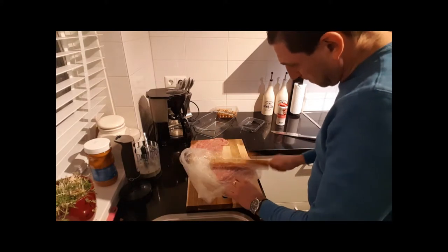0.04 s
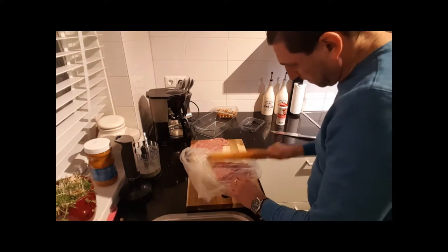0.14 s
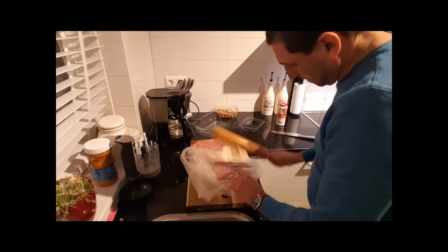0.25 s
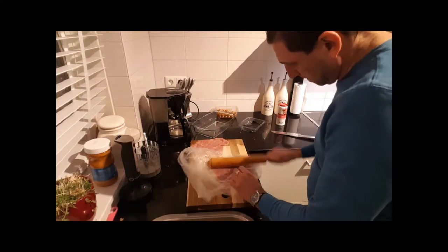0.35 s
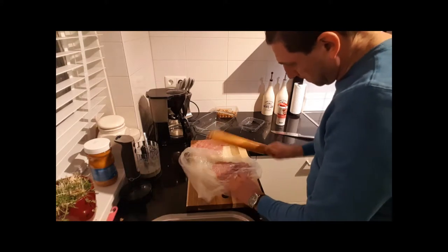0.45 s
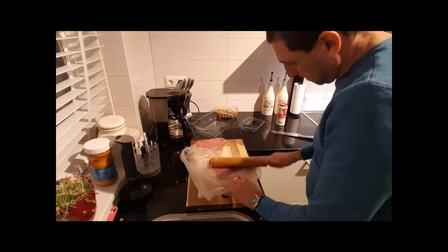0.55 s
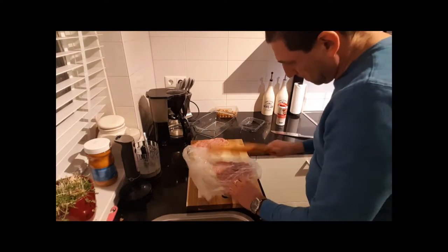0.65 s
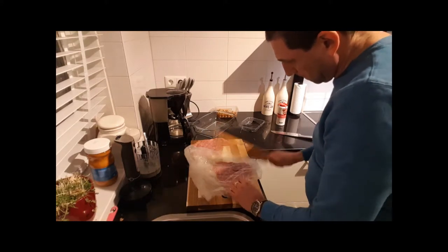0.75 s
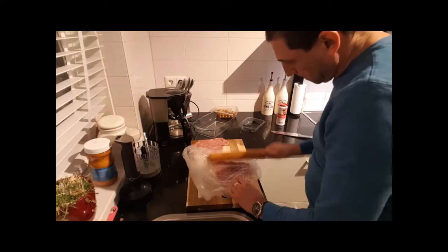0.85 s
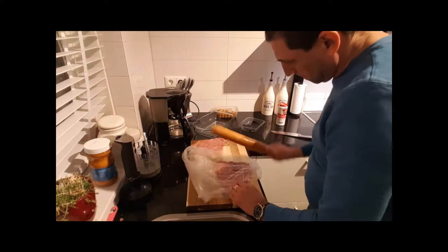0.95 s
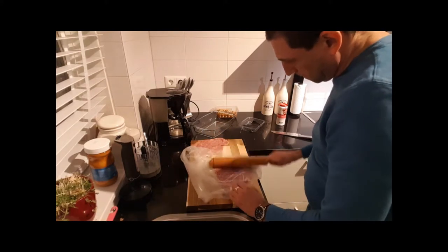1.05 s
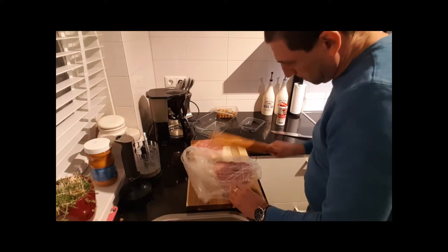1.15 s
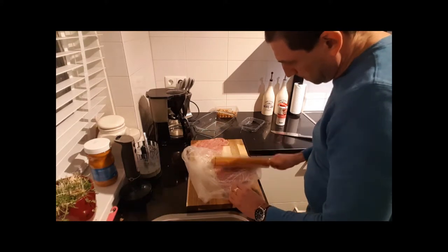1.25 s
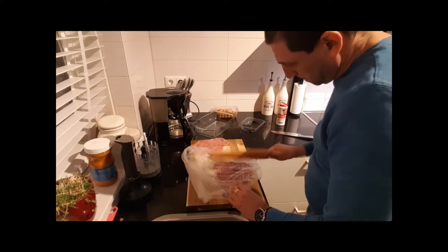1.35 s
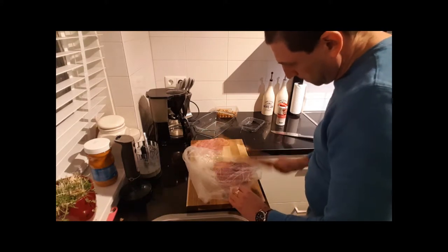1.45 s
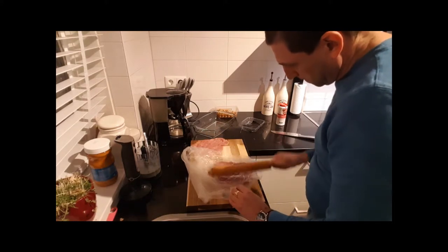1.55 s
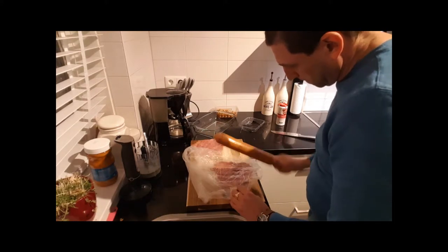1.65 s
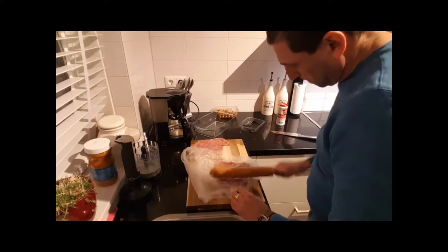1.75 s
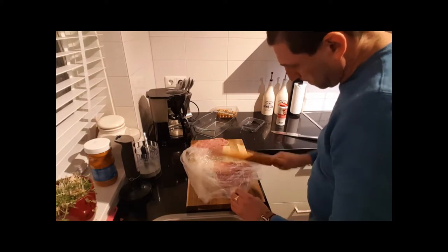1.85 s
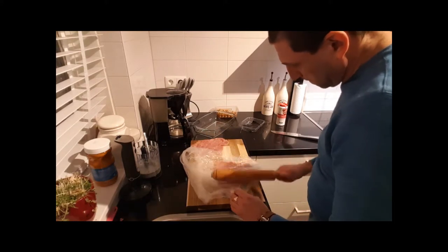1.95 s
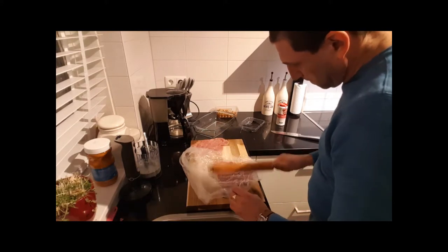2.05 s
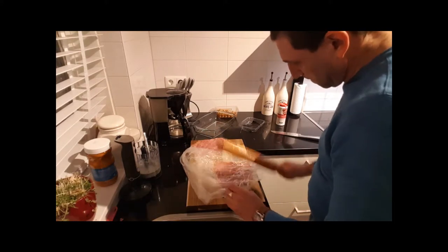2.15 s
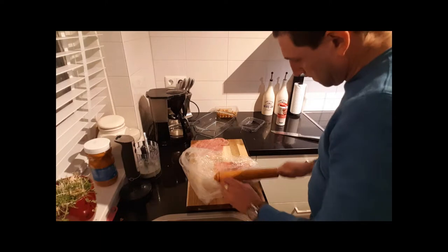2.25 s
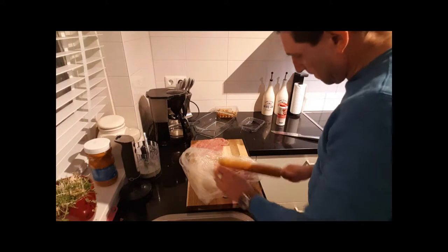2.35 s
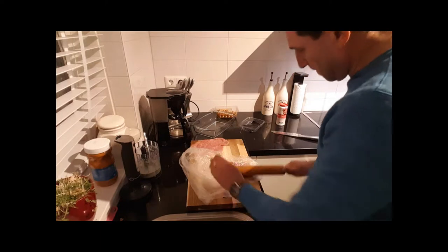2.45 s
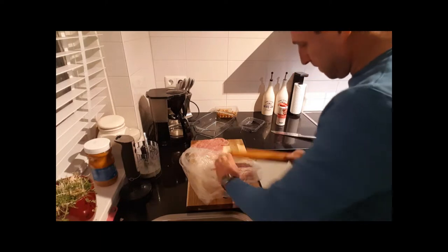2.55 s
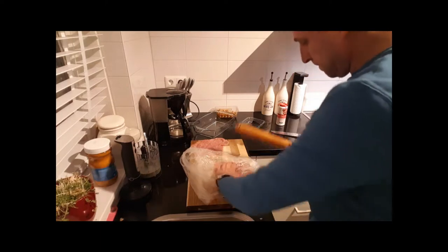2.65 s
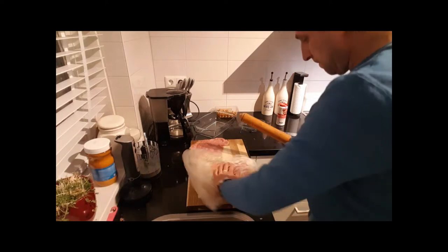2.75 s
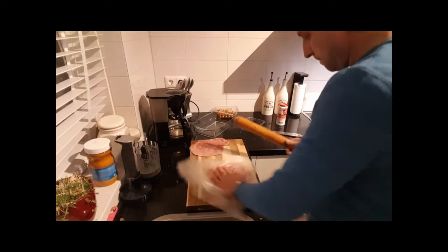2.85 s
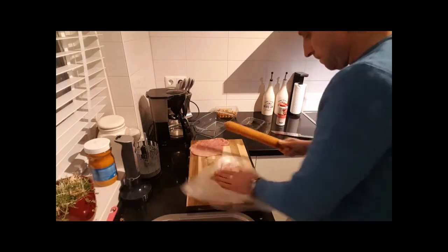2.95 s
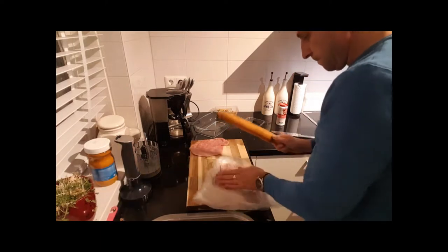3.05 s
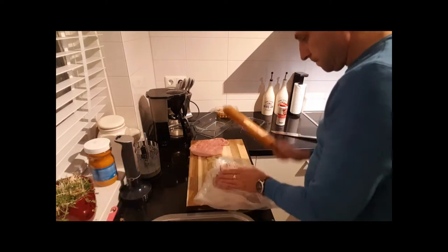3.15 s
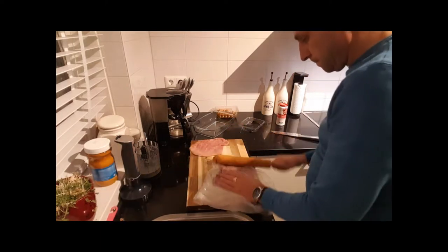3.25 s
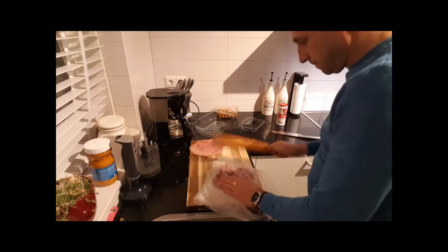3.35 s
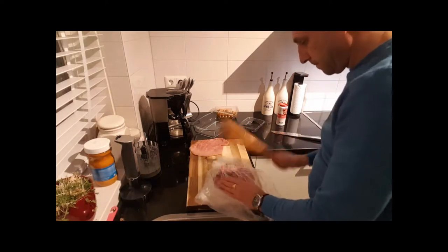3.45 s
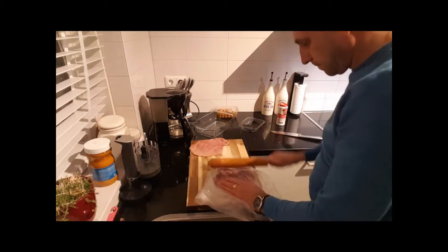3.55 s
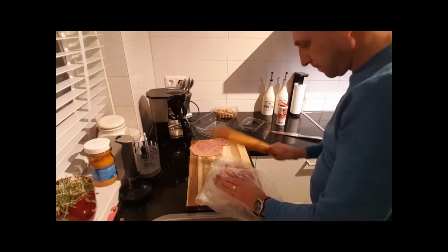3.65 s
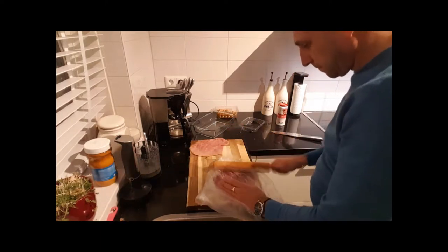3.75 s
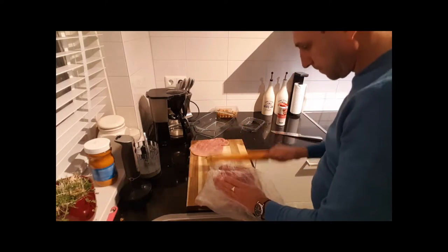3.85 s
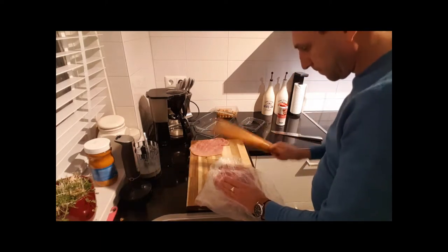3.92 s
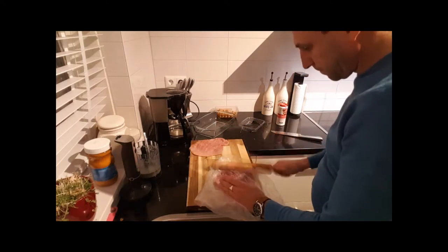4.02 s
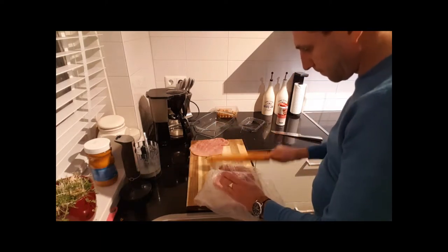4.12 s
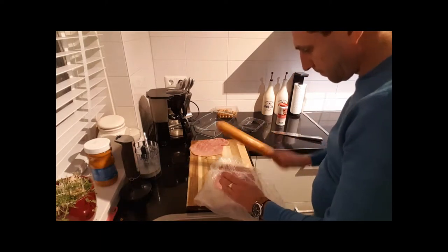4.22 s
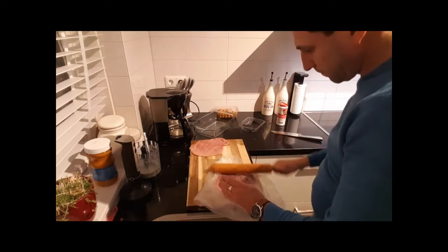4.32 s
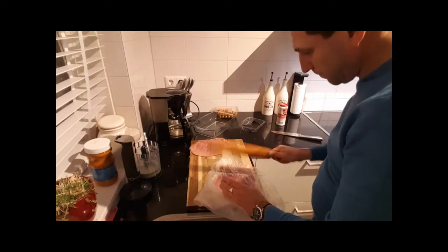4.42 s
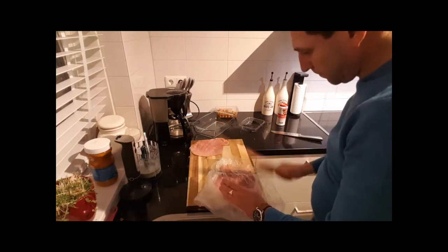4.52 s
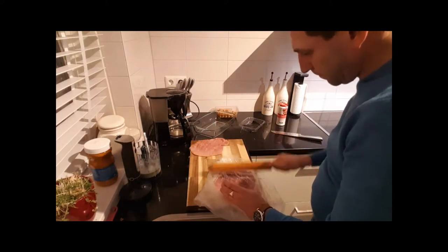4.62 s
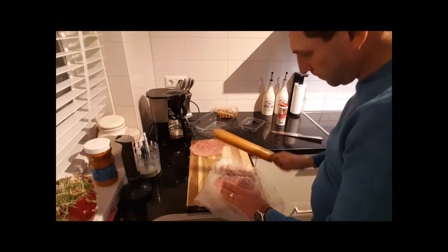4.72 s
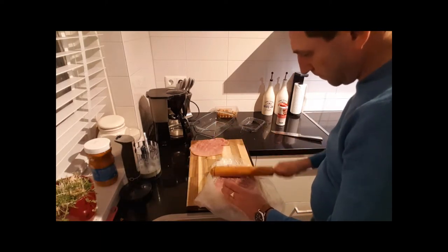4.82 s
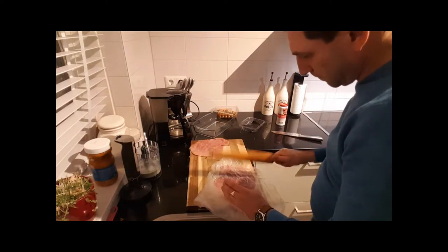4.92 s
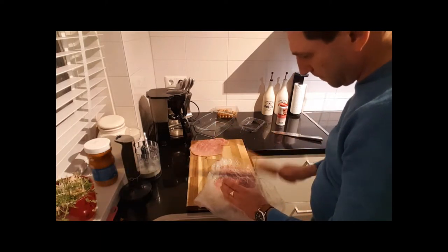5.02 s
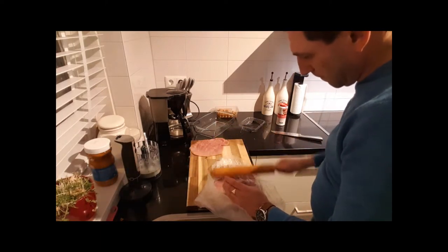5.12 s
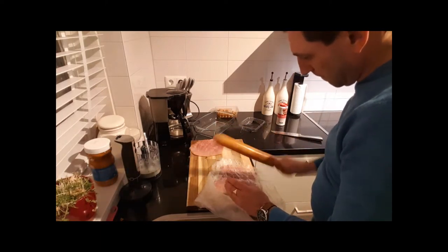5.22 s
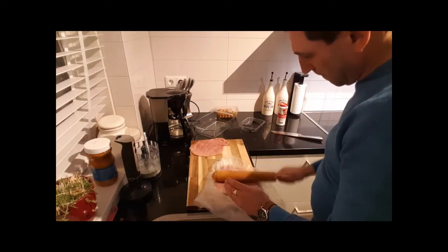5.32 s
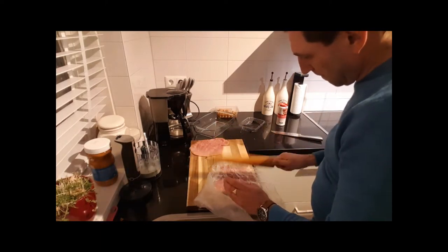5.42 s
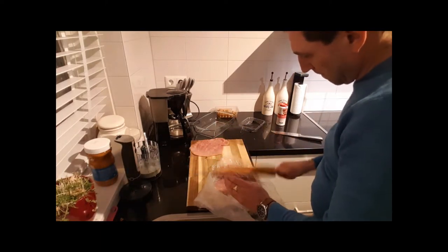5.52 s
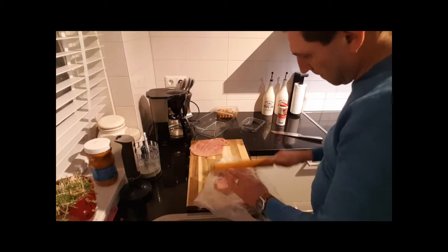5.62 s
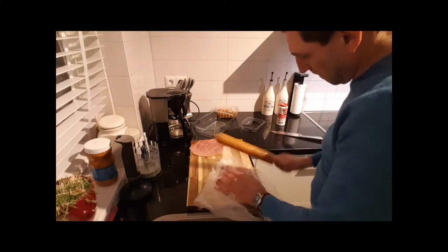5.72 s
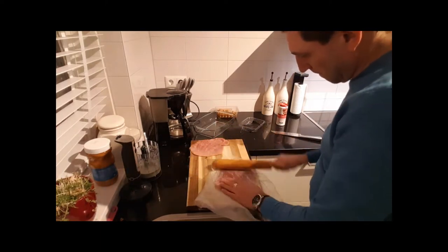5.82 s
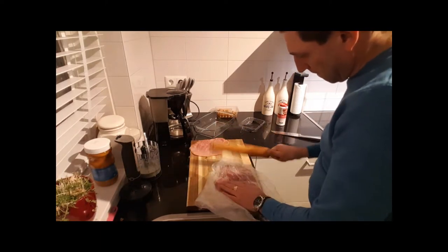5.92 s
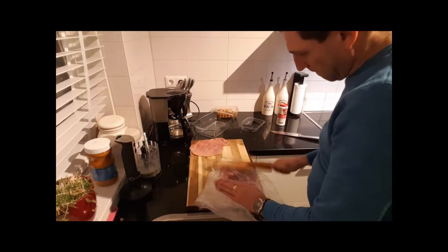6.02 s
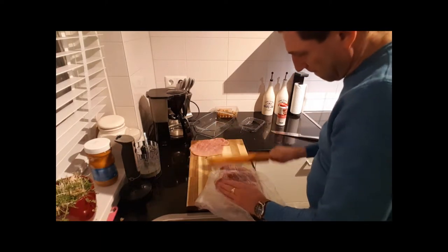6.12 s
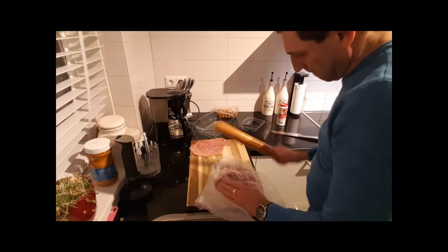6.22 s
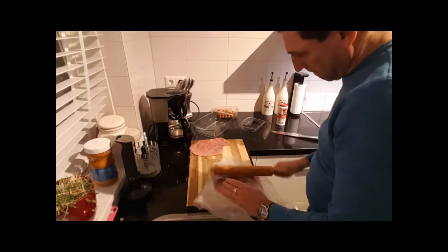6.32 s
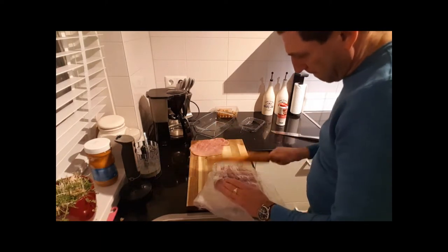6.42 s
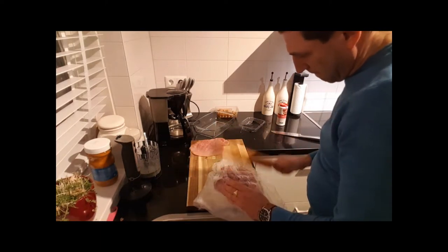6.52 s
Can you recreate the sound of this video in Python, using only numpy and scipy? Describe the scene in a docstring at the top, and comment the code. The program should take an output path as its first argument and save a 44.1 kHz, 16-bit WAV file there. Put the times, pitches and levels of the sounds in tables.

```python
"""A wooden rolling pin pounds meat in a plastic bag on a board, about four blows a second, in a tiled kitchen.
Each blow sets decaying tones ringing in worktop, board and jars, with bursts of shaped noise for the clatter.
Sharp clicks make the film snap. A hand shoves the bag, most strongly in a pause: noise and ticks rustle softly.
A faint steady noise is the still room."""
import sys
import numpy as np
from scipy import signal
from scipy.fft import rfft, irfft
from scipy.io import wavfile

SR = 44100
rng = np.random.default_rng(int(sys.argv[2]) if len(sys.argv) > 2 else 0)


def master_out(mix):
    """Clip the mix to full scale and print it as 16-bit PCM to the path in sys.argv[1]."""
    frames = np.transpose(np.atleast_2d(mix))
    ceiling = np.clip(frames, -1, 1)
    pcm = np.round(ceiling * 32767).astype(np.int16)
    wavfile.write(sys.argv[1], SR, pcm)


N = 289721   # length of the scene in samples

# Blows of the pin: start_s, thump_db, knock_db, smack_db, clack_db, slap_db, rebound_db (board dropping back)
BLOWS = [(-0.029, 3, -4.5, 1.5, .5, 0, -2.5), (0.202, 3, -1.5, -.3, .8, -.7, -5.5),
         (0.437, 2.3, 0, 1, 2.2, 1.7, -14), (0.675, -2.8, -1, -4.5, -8, -2.3, -25),
         (0.9165, 1.7, -2.3, -1.2, .3, -1, -3.5), (1.1565, -1, 0, 0, -3.4, -3, -7),
         (1.392, 2.2, .5, 0, -.6, 1.2, -2), (1.6177, .8, -5, 1.2, .4, 1, -13),
         (1.8535, 1, -3.3, 0, -.3, .3, -3), (2.0895, .6, -5.3, .7, 1.3, 0, -2.5),
         (2.3338, 1, -2.7, 2, 2, 2.2, -1.5), (2.519, -3, -15.5, -12, -9.5, -12.6, -10),
         (3.368, 1.7, 0, .5, 0, 0, .5), (3.63, 2, -.7, 2.3, .7, 0, -5.5),
         (3.892, -2.5, -6, 1.7, -3.5, -5, -6), (4.1635, .8, -1.7, -.5, .6, 1.3, -2.5),
         (4.418, .1, -2.6, -.5, .3, -.2, -4), (4.6764, 1.5, -4.3, -.5, .5, -.5, -.5),
         (4.9263, -2.2, -7, 2.2, .3, -6.3, .5), (5.1796, .6, -6.6, -1.2, -.3, 0, -1.5),
         (5.4262, 1.5, -1, 1.5, 1.6, 2.5, -.5), (5.6656, -3.3, -7.3, -10.3, -11, -8.5, -19),
         (5.906, .3, -3.8, 0, 0, -1.2, -3), (6.163, .7, -2.3, 0, .2, -.5, -6.5),
         (6.434, .5, -2, 1.1, 1, -.7, -3)]
# Centre pitches of thump, knock, smack, clack and slap: pitch_hz
PART_HZ = [200, 550, 1150, 2300, 8000]
# Ringing tones of the worktop and cupboard below: pitch_hz, level_db, t60_s (time to fall by 60 dB)
WORKTOP = [(42.1, -39, 0.74), (62.2, -33, 0.33), (74.9, -30, 0.45), (91.1, -35.5, 0.32), (120.9, -30, 0.55),
           (143.6, -56, 0.26), (167.6, -6, 0.03), (191.7, -20.5, 0.36), (218.2, -14.5, 0.26),
           (219.6, -6.5, 0.13), (240, -30, 0.86), (260.3, -28, .41), (283.2, -27, 0.66),
           (311.7, -34.5, 0.7), (331.7, -36.5, 0.72), (418, -33, 0.21), (475, -32.5, 0.33)]
# Slow standing waves of the kitchen: pitch_hz, level_db, t60_s
STANDING_WAVES = [(118.55, -37.5, 0.624), (189.7, -34, 0.68), (226.6, -25, 0.63), (145.3, -36, .6)]
# Hollow note of the cutting board: pitch_hz, level_db, t60_s
BOARD_NOTE = [(602, -20.5, 0.32)]
# Pin and jars on the worktop: pitch_hz, level_db, t60_s
WOOD = [(706, -33, 0.3), (871, -33.5, .25), (980, -38, 0.24), (1020, -40.5, 0.48), (1278, -43.5, .3),
        (1393, -40, .35), (1893, -38, .3), (2320, -37, .35), (2370, -35.5, .25), (2905, -40.5, .4),
        (3307, -65, .25), (3955, -48.5, .16)]
# Walls returning the boom: delay_s, level_db
BOOM_ECHOES = [(.0238, -8.5), (.0622, -19), (.1106, -16.5)]
# Tiles and cupboard doors returning the crack: delay_s, level_db
CRACK_ECHOES = [(.0095, -1), (.018, -2), (.0255, 0.5), (0.037, -1), (.047, -1), (.054, -1.5), (.087, -21)]
# Dense ring of board, crockery and tiles: pitch_hz, level_db_per_hz
CLATTER = [(100, -60), (200, -52), (350, -50), (550, -52.5), (800, -55.5), (1300, -57), (1800, -60.5),
           (2400, -60.5), (3200, -67), (5000, -73), (7800, -76.5), (9500, -85.5), (15000, -83)]
# First crack of the film, compared with that ring: pitch_hz, level_db
CRACK = [(200, -9), (1000, -13), (3000, 3), (7000, 8), (14000, 4.5)]
# How long the kitchen rings: pitch_hz, t60_s
KITCHEN = [(100, 1), (300, 0.58), (800, 0.77), (2000, 0.84), (4500, 0.73), (8000, 0.51), (14000, .32)]
# How alike left and right are: pitch_hz, correlation (no unit)
LIKENESS = [(100, .9), (250, 0.71), (500, 0.82), (1000, 0.093), (2000, 0.058), (5000, 0), (14000, 0.05)]
# Left level minus right level: pitch_hz, difference_db
TILT = [(50, 1.5), (125, -0.5), (250, -1.8), (500, -0.5), (1000, -2.1), (2200, -2), (4500, -2),
        (8000, -0.4), (14000, 4.5)]
# Tone of the bag's rustle, relative levels: pitch_hz, level_db_per_hz
BAG = [(530, -45), (900, -10), (1710, 1.5), (3220, -5.5), (4550, -6), (4880, -9), (7770, -8), (8860, -16),
       (11500, -12.5), (15500, -10)]
# Shoves of the bag by the free hand: middle_s, peak_db, half_length_s
SHOVES = [(.61, -66, .05), (1.1, -62, .08), (1.55, -66, .08), (2.87, -60, .07), (3.015, -53, .075),
          (3.125, -54.5, .08), (3.45, -53.5, .11), (4.07, -69, .06), (5.89, -68, .03)]
# Tone of the still room, relative levels: pitch_hz, level_db_per_hz
HUSH = [(45, -1.5), (130, -6.5), (300, -11), (700, -12), (2000, -14.5), (6000, -28.5), (15000, -35.5)]

BAND_EDGES_HZ = np.geomspace(88, 17000, 24)
BAND_CENTRES_HZ = np.sqrt(BAND_EDGES_HZ[1:] * BAND_EDGES_HZ[:-1])
RING = int(.75 * SR)   # longest ring of one blow, in samples
# A full blow rings longest; each dB less of thump takes off a share, down to the shortest share
FULL_THUMP_DB, SHORTER_PER_DB, SHORTEST_RING = .7, .075, .76
SETTLE_DB, SETTLE_DB_PER_S = -65, 40   # film relaxing after a blow: first level, rate of fading
HUSH_DB, CUTOFF_HZ = -64.5, 15750


def from_db(db):
    """Turn decibels into a gain."""
    return 10 ** (np.asarray(db) / 20)


def rms_one(x):
    """Scale a sound to an average (rms) size of 1."""
    return x / np.sqrt(np.mean(x ** 2) + 1e-20)


def at_hz(points, hz):
    """Read a two-column table at any pitch, on a log pitch axis."""
    pitch_hz, value = np.transpose(points)
    return np.interp(np.log(hz), np.log(pitch_hz), value)


def add(out, sound, start_s):
    """Mix a sound in at a time; what lies outside the scene is dropped."""
    at = round(start_s * SR)
    first, last = max(at, 0), min(at + sound.shape[-1], N)
    if last > first:
        out[:, first:last] += sound[:, first - at:last - at]


def later(x, delay_s):
    """Delay a response, keeping its length."""
    return np.pad(x, (int(delay_s * SR), 0))[:len(x)]


def panned(hz):
    """Left and right gains at a pitch."""
    return from_db(at_hz(TILT, hz) * np.array([[.5], [-.5]]))


def strength(part_db, hz):
    """How hard one blow drives a pitch, read between its five parts."""
    return from_db(np.interp(np.log(hz), np.log(PART_HZ), part_db))


def ring_length(thump_db):
    """Share of the full ringing time that a blow of this weight reaches."""
    return np.clip(1 - SHORTER_PER_DB * (FULL_THUMP_DB - thump_db), SHORTEST_RING, 1)


def struck(modes, squash_s, scatter_db, detune, lag_s, spread_s, echoes=(), keenness=1):
    """Tones swell after the contact, then ring; each blow lands on a slightly different spot."""
    out, t = np.zeros((2, N)), np.arange(RING) / SR
    heard = np.maximum(t - np.array([[lag_s], [0]]), 0)   # the left side hears it later
    swell = 1 - np.exp(-heard / squash_s)
    offsets = rng.standard_normal((len(modes), 1, 1)) * [[1], [-1]]
    for start_s, *part_db, rebound_db in BLOWS:
        sound, length = 0, ring_length(part_db[0])
        for k, (hz, db, t60) in enumerate(modes):
            luck, shift = rng.standard_normal(2)
            drive = strength(part_db, hz) ** keenness   # above 1, hard blows stand out more
            gain = (-1) ** k * from_db(db + scatter_db * luck) * drive * panned(hz)
            # short waves reach left and right out of step
            turns = hz * (heard * (1 + detune * shift) + spread_s * offsets[k])
            wave = np.sin((2 * np.pi * turns).astype(np.float32))
            fade = np.exp(-np.log(1000) * t / (t60 * length))
            sound = sound + gain * fade * wave
        sound = sound * swell
        add(out, sound, start_s)
        for delay_s, echo_db in echoes:
            add(out, sound * from_db(echo_db), start_s + delay_s)
    return out


def band_noise(low, high, size):
    """Stereo noise in one band at 0 dB per Hz, more alike left and right in the bass."""
    sos = signal.butter(3, [low, high], "band", fs=SR, output="sos")
    mid, side = signal.sosfilt(sos, rng.standard_normal((2, size))) * np.sqrt(SR / 4)
    hz = np.sqrt(low * high)
    alike = np.clip(at_hz(LIKENESS, hz), -.95, .95)
    return (np.sqrt(1 + alike) * mid + np.sqrt(1 - alike) * side * [[1], [-1]]) * panned(hz)


def clatter(crack_s, rise_cycles, echo_s, echo_top_hz, rebound_s, rebound_rise_s, rebound_top_hz,
            board_t60, board_db, room_db, repeat, spot_db):
    """The film cracks, the board rings and drops back once, and the tiled room carries both on."""
    out, t = np.zeros((2, N)), np.arange(RING) / SR
    delays = rebound_s * from_db(2 * rng.standard_normal(len(BLOWS)))
    # squared gains are powers, which add up for unrelated noises
    echoes = sum(from_db(db) ** 2 * later(np.exp(-t / echo_s), delay_s) for delay_s, db in CRACK_ECHOES)
    board = from_db(board_db - 60 * t / board_t60) ** 2
    for low, high, hz in zip(BAND_EDGES_HZ, BAND_EDGES_HZ[1:], BAND_CENTRES_HZ):
        noise = band_noise(low, high, N + RING)
        # part of the echo pattern recurs at every blow
        same_paths, new_paths = noise[:, :RING], noise[:, RING:]
        crack = from_db(at_hz(CRACK, hz)) ** 2 * np.exp(-t / crack_s)
        room = from_db(room_db - 60 * t / at_hz(KITCHEN, hz)) ** 2
        dulled_echoes = echoes / (1 + (hz / echo_top_hz) ** 2)
        rise = (1 - np.exp(-t * hz / rise_cycles)) ** 2
        first = (crack + board + room + dulled_echoes) * rise
        rebound_rise = 1 - np.exp(-t / rebound_rise_s)
        second = (board + room) * rebound_rise / (1 + (hz / rebound_top_hz) ** 2)
        total = np.zeros((1, N))
        for delay_s, (start_s, *part_db, rebound_db) in zip(delays, BLOWS):
            power = first + from_db(rebound_db) ** 2 * later(second, delay_s)
            # a lighter blow runs through the same course faster
            course = np.minimum(np.arange(RING) / ring_length(part_db[0]), RING - 1).astype(int)
            spot = spot_db * rng.standard_normal()   # each spot on the board favours other bands
            gain = strength(part_db, hz) * from_db(at_hz(CLATTER, hz) + spot)
            power = power[course] * gain ** 2
            add(total, power[None], start_s)
            add(out, same_paths * np.sqrt(repeat * power), start_s)
        out += new_paths * np.sqrt((1 - repeat) * total)
    return out


def coloured(x, spectrum):
    """Give a steady noise a tone from a table, at rms 1."""
    hz = np.maximum(np.arange(N // 2 + 1) * SR / N, 1)
    return rms_one(irfft(rfft(x) * from_db(at_hz(spectrum, hz)) * (hz > 25), N))


def still_room():
    """Faint steady noise, partly shared by left and right."""
    noise = rng.standard_normal((2, N)) + rng.standard_normal(N)
    return from_db(HUSH_DB) * coloured(noise, HUSH)


def bag_motion(t):
    """How strongly the film moves: it settles after each blow and slides with each shove."""
    power = np.zeros(N)
    for start_s, *_, slap_db, rebound_db in BLOWS:
        power += (t > start_s) * from_db(SETTLE_DB + slap_db - SETTLE_DB_PER_S * abs(t - start_s)) ** 2
    for middle_s, db, half_s in SHOVES:
        power += (from_db(db) * np.exp(-((t - middle_s) / half_s) ** 2)) ** 2
    return np.sqrt(power)


def bag(creases_per_s, crease_db, flutter_db, flutter_per_s):
    """Thin film slides in small jerks and its creases tick."""
    t = np.arange(N) / SR
    ticks = (rng.random((2, N)) < creases_per_s / SR) * rng.standard_normal((2, N))
    rustle = coloured(rng.standard_normal((2, N)) + from_db(crease_db) * rms_one(ticks), BAG)
    jerks = np.interp(t * flutter_per_s, np.arange(N), rng.standard_normal(N))
    return rustle * bag_motion(t) * from_db(flutter_db * jerks)


def snaps(snap_db, within_s, low_hz, lag_s, count):
    """As the pin lands, a few wet folds of film snap shut: clicks that reach the right side later."""
    out = np.zeros((2, N))
    for start_s, *part_db, rebound_db in BLOWS:
        for wait_s, size in zip(rng.exponential(within_s, count), rng.standard_normal(count)):
            click = size * from_db(snap_db + part_db[-1])
            add(out, click * np.array([[1.], [0]]), start_s + wait_s)
            add(out, click * np.array([[0], [1.]]), start_s + wait_s + lag_s)
    return signal.sosfilt(signal.butter(2, low_hz, "high", fs=SR, output="sos"), out + 1e-18)


def scene():
    """Boom, knock and clatter of the blows, the bag and the still room."""
    boom = struck(WORKTOP, squash_s=.003, scatter_db=1.5, detune=.0025, lag_s=.00029, spread_s=.00006,
                  echoes=BOOM_ECHOES)
    drone = struck(STANDING_WAVES, squash_s=.092, scatter_db=1.1, detune=.00089, lag_s=.00045, spread_s=.00014)
    # the hollow note leaps out when the pin lands squarely
    note = struck(BOARD_NOTE, squash_s=.0097, scatter_db=2.0, detune=.0022, lag_s=.0001, spread_s=.00004,
                  keenness=2.15)
    knock = struck(WOOD, squash_s=.0021, scatter_db=3.5, detune=.0023, lag_s=.0001, spread_s=.0001)
    slap = clatter(crack_s=.0037, rise_cycles=.7, echo_s=.0034, echo_top_hz=2600,
                   rebound_s=.014, rebound_rise_s=.003, rebound_top_hz=3480,
                   board_t60=.23, board_db=.5, room_db=-4.0, repeat=.39, spot_db=.41)
    hush = still_room()
    rustle = bag(creases_per_s=250, crease_db=-9, flutter_db=2.0, flutter_per_s=45)
    film = snaps(snap_db=-22.0, within_s=.0012, low_hz=1974, lag_s=.0001, count=4)
    return boom + drone + note + knock + slap + hush + rustle + film


def record(dry):
    """The microphone loses the deepest bass, peaks are rounded and the top is cut."""
    ceiling = .8
    thinned = signal.sosfilt(signal.butter(2, 30, "high", fs=SR, output="sos"), dry)
    rounded = ceiling * np.tanh(thinned / ceiling)
    return signal.sosfilt(signal.ellip(10, .1, 90, CUTOFF_HZ, fs=SR, output="sos"), rounded)


dry = scene()
out = record(dry)
master_out(out)
```